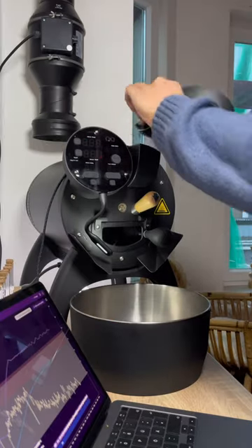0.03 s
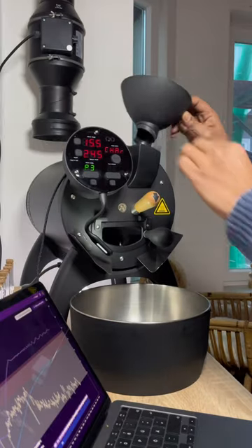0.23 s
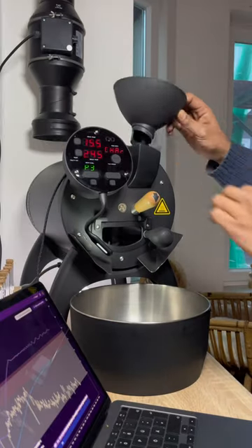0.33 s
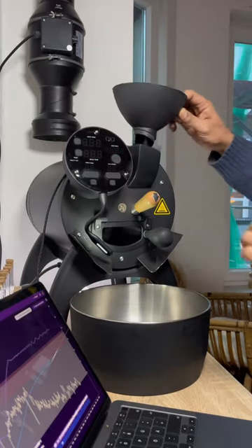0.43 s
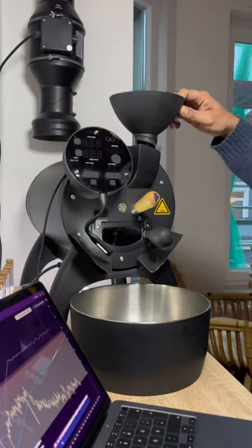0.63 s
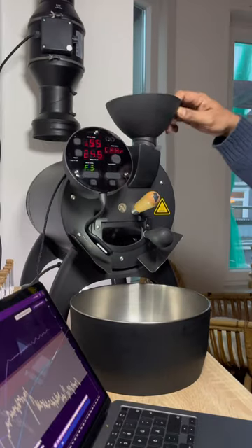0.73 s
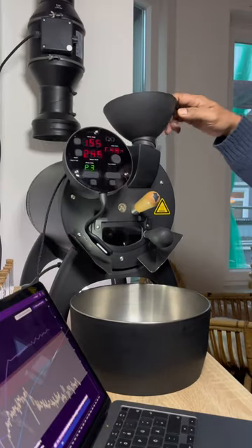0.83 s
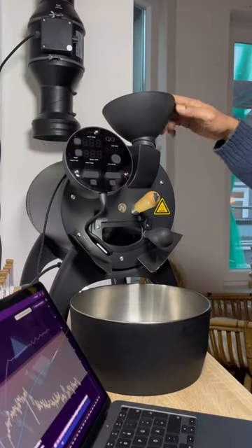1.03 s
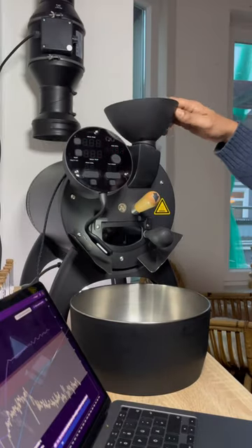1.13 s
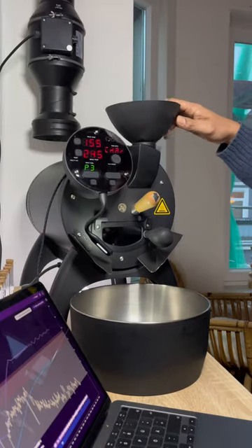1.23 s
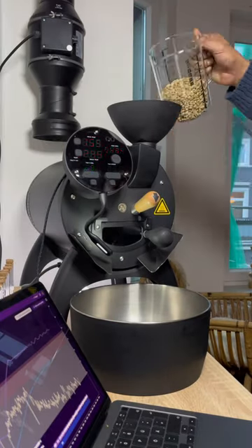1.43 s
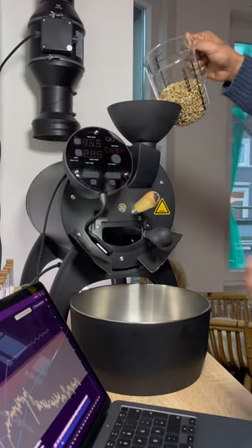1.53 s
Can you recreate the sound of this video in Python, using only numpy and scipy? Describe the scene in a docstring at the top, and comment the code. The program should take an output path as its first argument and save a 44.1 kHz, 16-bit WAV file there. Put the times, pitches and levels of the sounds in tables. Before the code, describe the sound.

In a small workroom, a metal funnel bumps, clinks sharply and knocks hard onto a nearby coffee roaster. Softer bumps follow, then faint ticks of beans in a jug, all over the steady hum of motor and fan.

```python
"""A metal funnel clinks on the inlet of a humming coffee roaster, drops home with a loud knock and is
nudged into place. Every contact rings the funnel and the hollow inlet and thumps the roaster's housing.
Then a few beans click in a lifted jug. The roaster's motor, fan and duct hiss run throughout;
the knocks and clicks reverberate in a small workroom."""
import sys
import numpy as np
from scipy import signal
from scipy.fft import rfft, irfft
from scipy.io import wavfile
from scipy.ndimage import uniform_filter1d

SR = 44100
rng = np.random.default_rng(int(sys.argv[2]) if len(sys.argv) > 2 else 0)


def persist_wave(psi):
    """Save psi, clipped to +-1, as 16-bit WAV."""
    counts = np.round(np.clip(psi, -1, 1) * 32767).astype(np.int16)
    wavfile.write(sys.argv[1], SR, np.atleast_2d(counts).T)


N = 70560
LOW_CUT_HZ, TOP_HZ = 64.3, 15900

# Each row: start in seconds, relative levels in dB of housing thud, inlet, funnel clang and rim tick,
# contact hardness as cut-off in Hz, neck pitch in Hz, neck level in dB.
CONTACTS = [(.218, -50, -33.5, -34, -39.5, 1270, 540, -41), (0.227, -29, -31.5, -58, -56, 1284, 423, -44),
            (0.351, -38, -36.5, -46, -61, 1200, 486, -39), (.364, -40, -30.5, -41, -43.5, 1000, 480, -33.5),
            (.486, -46, -29, -31.5, -43, 915, 490, -35), (0.5065, -51, -29, -44, -22, 7000, 1555, -41.5),
            (.512, -35, -25.5, -53, -26.5, 5000, 594, -28),
            (0.5209, -36, -33.5, -59, -24.5, 2160, 646, -33), (.532, -38, -29, -62, -40, 1500, 242.7, -27),
            (0.6218, -28.5, -31.5, -17, -23.5, 9150, 819, -30.5),
            (0.6239, -13, -21.5, -18.5, -19.5, 5900, 478, -33),
            (0.7967, -51, -29, -29.5, -40, 1070, 479, -28.5), (0.806, -30, -32, -35.5, -55, 1010, 489, -31),
            (1.106, -35, -49, -62, -72, 920, 324, -48), (1.196, -38.5, -40.5, -61, -72, 990, 382, -45),
            (1.241, -39, -34, -36, -64, 980, 520, -36), (1.322, -36, -38, -35.5, -67, 1170, 796, -41),
            (1.3282, -33, -38, -33.5, -69, 1000, 856, -33.5)]
# Each row: mode in Hz, relative level in dB, T60 in seconds.
HOUSING_MODES = [(131.2, -2, 0.15), (156.6, 1.5, 0.15), (206.3, -2.5, 0.19), (241, 2, 0.086),
                 (263.6, -14, 0.49)]
INLET_MODES = [(269, -5, 0.085), (390, -11, 0.028), (469.8, 1, 0.091), (565.6, 1, 0.089)]
FUNNEL_MODES = [(904, -5, 0.16), (1008, -9.5, 0.22), (1122.6, -5, 0.23), (1200, -6.5, 0.23),
                (1295, -2.5, 0.085), (1308, 3.5, 0.03), (1724, -12, 0.08), (1815, -5.5, 0.033),
                (2035, -6, 0.033), (2354, -7.5, 0.057), (3297, 2.5, 0.022), (3500, -0.5, 0.028),
                (4130, -7, 0.025)]
RIM_MODES = [(2500, -9, 0.027), (3440, -11, 0.056), (3570, -13, 0.04), (4096, -2.5, 0.044),
             (4270, -1, 0.033), (6730, -5, 0.044), (7400, -30, 0.052)]
# Spectra of the dense, short resonances. Each row: frequency in Hz, relative density in dB.
HOUSING_SPECTRUM = [(40, -37), (90, -45), (170, 9.5), (300, -7), (600, -3.5), (1500, -71)]
INLET_SPECTRUM = [(120, -3.5), (260, 6), (500, 0), (800, -12), (1400, -18), (9000, -62)]
FUNNEL_SPECTRUM = [(400, -30.5), (780, -3), (1250, -6.5), (1550, -20), (1850, -6.5), (2150, -17.5),
                   (2700, -16.5), (3400, -25), (3750, -16.5), (4300, -12), (6000, -36), (16000, -63)]
RIM_SPECTRUM = [(1000, -11.5), (2300, -7), (4050, 3), (5100, -9.5), (6700, 0.5), (8000, -3), (10500, 3.5),
                (12500, -4), (16000, -18)]


def funnel():
    """Each contact rings rim, funnel, neck and inlet, then thumps the housing. Returns rings, cracks."""
    rings, cracks = np.zeros((2, 2, N))
    for start_s, thud_db, inlet_db, clang_db, tick_db, cutoff_hz, neck_hz, neck_db in CONTACTS:
        thud_start_s = start_s + 0.0033
        thud = amp(thud_db) * rise(0.0036)
        add(rings, thud_start_s, thud * amp(0.5) * ring(HOUSING_MODES, detune=0.0023))
        add(cracks, thud_start_s, thud * amp(-0.5) * crack(HOUSING_SPECTRUM, t60_s=0.064))

        hollow = rise(0.0015)
        add(rings, start_s, hollow * amp(inlet_db - 3.5) * ring(INLET_MODES, detune=0.0059))
        add(rings, start_s, hollow * amp(neck_db) * ring([(neck_hz, 0, 0.086)], detune=0.004))
        add(cracks, start_s, hollow * amp(inlet_db - 2) * crack(INLET_SPECTRUM, t60_s=0.11))

        clang = amp(clang_db) * rise(0.00023)
        add(rings, start_s, clang * amp(-0.5) * soften(ring(FUNNEL_MODES, detune=0.0013), cutoff_hz))
        add(cracks, start_s, clang * amp(-3) * soften(crack(FUNNEL_SPECTRUM, t60_s=0.049), cutoff_hz))

        rim_cutoff_hz = 4.7 * cutoff_hz
        tick = amp(tick_db) * rise(0.00014)
        add(rings, start_s, tick * amp(-8) * soften(ring(RIM_MODES, detune=0.0019), rim_cutoff_hz))
        add(cracks, start_s, tick * amp(0.5) * soften(crack(RIM_SPECTRUM, t60_s=0.021), rim_cutoff_hz))
    return rings, cracks


def ring(modes, detune):
    """Decaying modes (Hz, dB, T60 in seconds), detuned by the grip and spread in phase between the ears."""
    out = np.zeros((2, N))
    width_hz, side_db = np.array(STEREO_WIDTH, float).T
    for (hz, db, t60_s), (shift, side) in zip(modes, rng.standard_normal((len(modes), 2))):
        spread_rad = np.sign(side) * np.arctan(amp(np.interp(hz, width_hz, side_db)))
        phase = 2 * np.pi * hz * (1 + detune * shift) * clock()
        polarity = np.sign(shift) if hz > INLET_MODES[-1][0] else 1
        out += polarity * amp(db) * fade(t60_s) * np.sin([phase + spread_rad, phase - spread_rad])
    power = sum(amp(db) ** 2 for _, db, _ in modes) / 2
    return out / np.sqrt(power)


def crack(spectrum, t60_s):
    """Dense resonances struck together: a noise burst that dies fast."""
    envelope = fade(t60_s)
    burst = colour(noise(), spectrum) * envelope
    return unit(burst) * np.sqrt(np.mean(envelope ** 2))


def soften(x, cutoff_hz):
    """A softer, longer contact leaves out the high resonances."""
    return butterworth(x, 3, min(cutoff_hz, TOP_HZ), "low")


# Each row: start in seconds, high tick in dB, lower clack in dB, wall pitch in Hz, wall clink in dB.
BEAN_HITS = [(1.4425, -26, -51, 6660, -57), (1.4676, -31, -37, 3000, -47), (1.476, -33.5, -57, 7840, -63),
             (1.487, -40, -42, 5930, -48), (1.504, -46, -48, 6000, -51), (1.54, -31, -36.5, 4300, -42.5),
             (1.572, -39, -40, 5860, -46), (1.586, -33, -37, 8780, -37), (1.594, -41, -46, 4312, -57)]
# Each row: frequency in Hz, relative density in dB.
TICK_SPECTRUM = [(5000, -23), (8700, -12.5), (11000, 9), (12400, 5), (13800, -4), (15500, -10),
                 (17000, -27)]
CLACK_SPECTRUM = [(1500, -42), (3000, -12), (4300, -2.5), (5100, -6.5), (5900, -3.5), (7000, -6), (8600, 3),
                  (12000, 3.5), (16000, -13)]


def beans(jug_t60_s=0.035):
    """Hard beans tick against the jug, whose wall clinks at a pitch set by the spot they strike."""
    out = np.zeros((2, N))
    for start_s, tick_db, clack_db, clink_hz, clink_db in BEAN_HITS:
        tick = amp(tick_db) * crack(TICK_SPECTRUM, t60_s=0.024)
        clack = amp(clack_db) * crack(CLACK_SPECTRUM, t60_s=0.074)
        clink = amp(clink_db) * ring([(clink_hz, 0, jug_t60_s)], detune=0.001)
        add(out, start_s, (tick + clack + clink) * rise(0.000077))
    return out


# Motor and fan tones. Each row: frequency in Hz, rms level in dB.
HUM_TONES = [(114, -50.5), (263.8, -50), (382.2, -52), (522.2, -56), (952.8, -63.5), (1373, -65)]
# Each row: frequency in Hz, relative density in dB.
FAN_SPECTRUM = [(18, -61), (30, 11), (86, -11), (122, 1.5), (234, -4.5), (265, -11), (289, -2), (377, -6),
                (526, -8.5), (810, -11), (2000, -25), (2600, -29), (4400, -120)]
DUCT_SPECTRUM = [(900, -54), (2000, 0), (2500, 3.5), (3200, 0), (4100, 2.5), (4900, -8.5), (5500, 1.5),
                 (6100, -5.5), (6700, -1), (7600, -7), (9500, -12.5), (12300, -4.5), (14000, -18.5),
                 (16000, -11.5)]


def roaster(flutter_depth=0.6, flutter_hz=14, fan_db=-40.5, hiss_db=-55.5):
    """Fluttering motor tones over the steady rush of the fan and the hiss of air in its ducts."""
    hum = np.zeros(N)
    for hz, db in HUM_TONES:
        flutter = 1 + flutter_depth * (walk(flutter_hz) + 1j * walk(flutter_hz))  # level and phase
        tone = np.real(flutter * np.exp(2j * np.pi * hz * clock()))
        hum += amp(db) * unit(tone)
    fan = amp(fan_db) * unit(colour(noise(), FAN_SPECTRUM))
    hiss = amp(hiss_db) * unit(colour(noise(), DUCT_SPECTRUM))
    return hum + fan + hiss


# Each row: frequency in Hz, reverberation gain in dB.
ROOM_RESPONSE = [(60, -32), (200, -8), (500, -6.5), (1200, -5), (3000, -3.5), (7000, -0.5), (14000, -10.5)]


def room(x, crossover_hz=3500):
    """Diffuse reflections of a small room, fed by the left channel; the treble dies first."""
    low = butterworth(noise(), 2, crossover_hz, "low") * fade(t60_s=0.52)
    high = butterworth(noise(), 2, crossover_hz, "high") * fade(t60_s=0.18)
    tail = (low + high) * rise(0.001)
    tail /= np.sqrt(np.sum(tail ** 2) / 2)
    tail = colour(tail, ROOM_RESPONSE)[:, :N // 2]
    return signal.fftconvolve(x[:1], tail, axes=1)[:, :N]


# Each row: frequency in Hz, side against mid in dB.
STEREO_WIDTH = [(60, -17), (200, -32), (380, -11), (700, 0.5), (1250, -2), (1750, -8.5), (2500, -1.5),
                (4200, -1.5), (6000, -8.5), (7300, -1), (8700, 3.5), (10300, 33), (11500, 10.5),
                (13000, -8), (14500, -6)]


def noise():
    """White stereo noise, alike in both ears in the bass and in antiphase near 10 kHz."""
    mid_curve = [(hz, -10 * np.log10(1 + amp(db) ** 2)) for hz, db in STEREO_WIDTH]
    side_curve = [(hz, -10 * np.log10(1 + amp(-db) ** 2)) for hz, db in STEREO_WIDTH]
    mid = colour(rng.standard_normal(N), mid_curve)
    side = colour(rng.standard_normal(N), side_curve)
    return np.array([mid + side, mid - side])


def colour(x, curve):
    """Filter by a curve of (Hz, dB) points."""
    hz, db = np.array(curve, float).T
    bins_hz = np.maximum(np.fft.rfftfreq(N, 1 / SR), 1)
    gain = amp(np.interp(np.log(bins_hz), np.log(hz), db))
    return irfft(rfft(x) * gain, N)


def butterworth(x, order, cutoff_hz, kind):
    """Low-pass or high-pass filter."""
    return signal.sosfilt(signal.butter(order, cutoff_hz, kind, fs=SR, output="sos"), x)


def amp(db):
    """Decibels to gain."""
    return 10 ** (np.asarray(db) / 20)


def clock():
    """Sample times in seconds."""
    return np.arange(N) / SR


def unit(x):
    """Scale to rms 1."""
    return x / np.sqrt(np.mean(x ** 2))


def fade(t60_s):
    """Exponential decay."""
    return np.exp(-np.log(1000) * clock() / t60_s)


def rise(tau_s):
    """Smooth onset."""
    return 1 - np.exp(-clock() / tau_s)


def walk(rate_hz):
    """Slow random wander with a spread near 1."""
    hold = int(SR / rate_hz)
    steps = np.repeat(rng.standard_normal(N // hold + 1), hold)
    return uniform_filter1d(steps, hold)[:N]


def add(out, start_s, x):
    """Mix x into out from start_s on."""
    first = int(start_s * SR)
    out[:, first:] += x[:, :N - first]


# Each row: frequency in Hz, left against right in dB.
BALANCE = [(60, 0), (250, -2.5), (600, 1), (1100, 1), (2000, 1), (4000, 0.5), (12000, -2.5)]


def scene():
    """Funnel and beans in the room, over the running roaster."""
    rings, cracks = funnel()
    clatter = cracks + beans()
    reflections = room(clatter + amp(-8) * rings)
    left, right = rings + clatter + reflections + roaster()
    left = colour(left, [(hz, db / 2) for hz, db in BALANCE])
    right = colour(right, [(hz, -db / 2) for hz, db in BALANCE])
    return np.array([left, right])


def record(dry):
    """Roll off the deep bass and cut the top steeply."""
    high_passed = butterworth(dry, 3, LOW_CUT_HZ, "high")
    return signal.sosfilt(signal.ellip(8, 0.2, 70, TOP_HZ, fs=SR, output="sos"), high_passed)


dry = scene()
out = record(dry)
persist_wave(out)
```